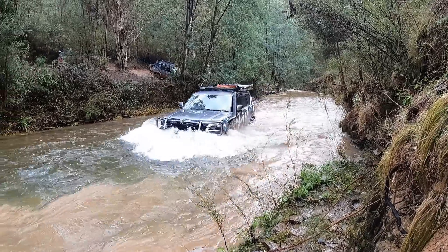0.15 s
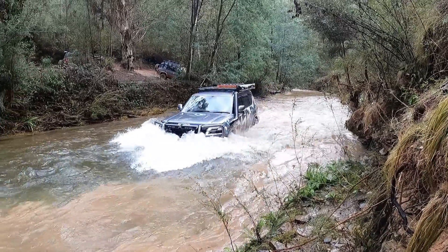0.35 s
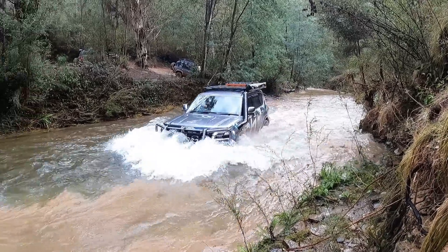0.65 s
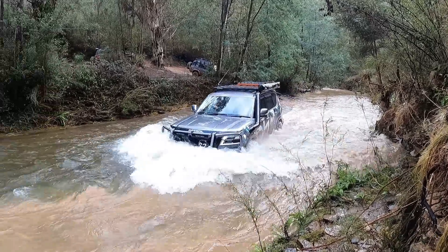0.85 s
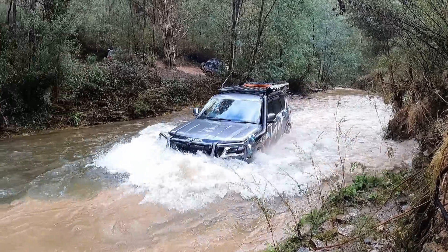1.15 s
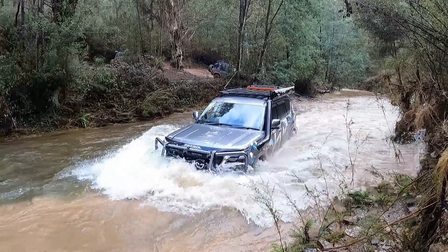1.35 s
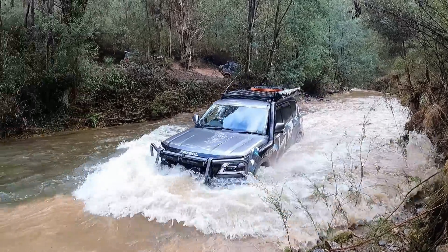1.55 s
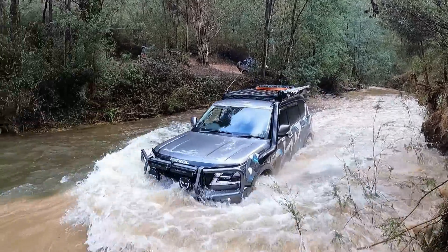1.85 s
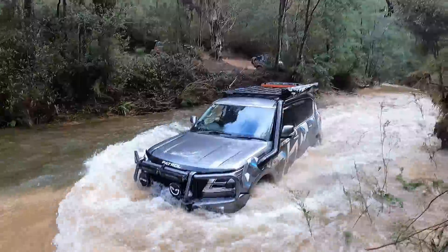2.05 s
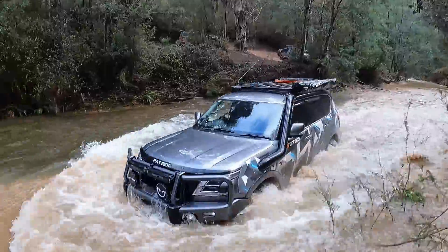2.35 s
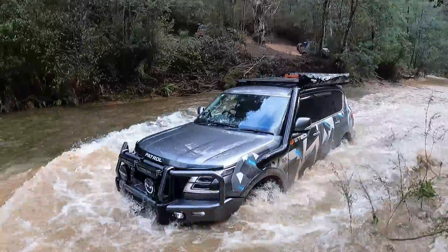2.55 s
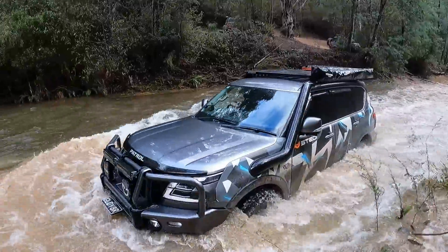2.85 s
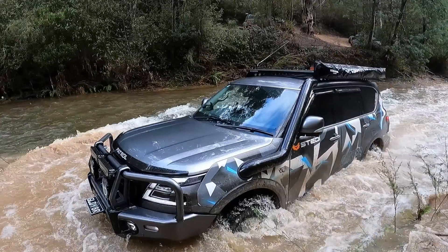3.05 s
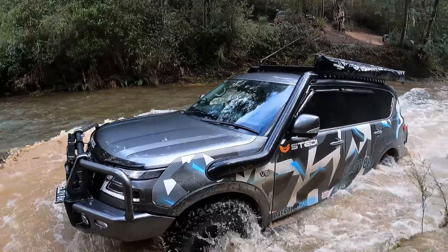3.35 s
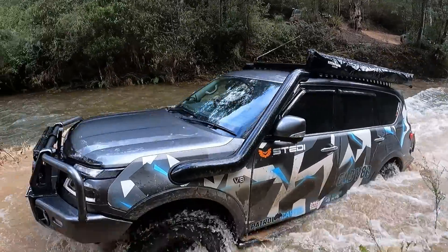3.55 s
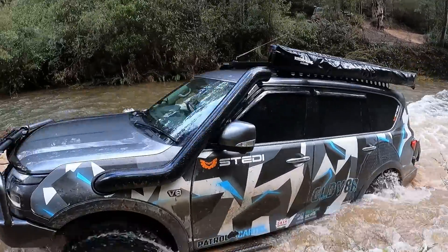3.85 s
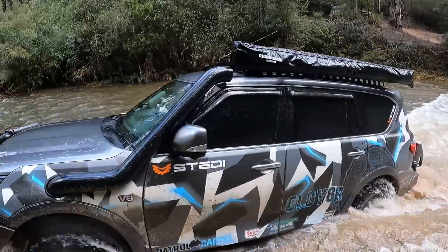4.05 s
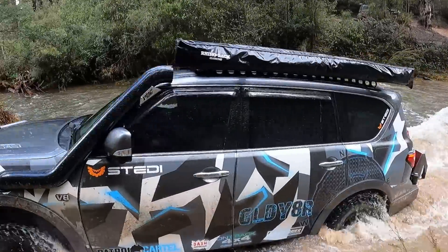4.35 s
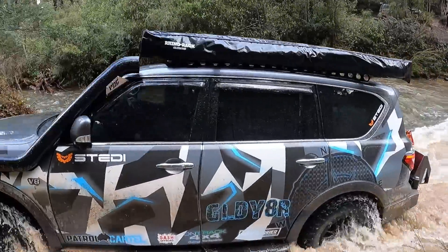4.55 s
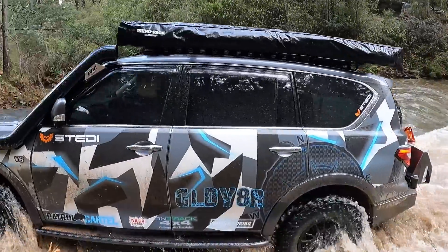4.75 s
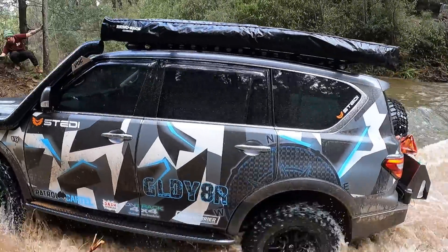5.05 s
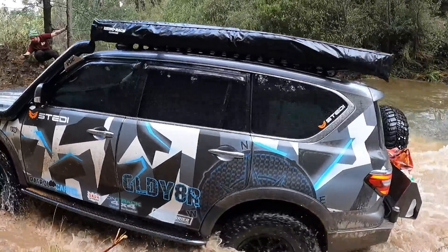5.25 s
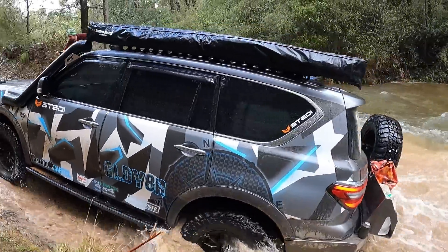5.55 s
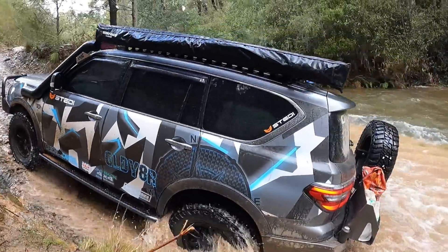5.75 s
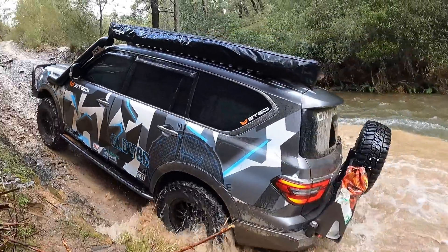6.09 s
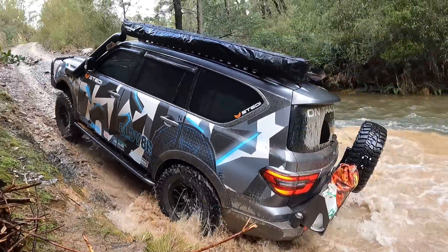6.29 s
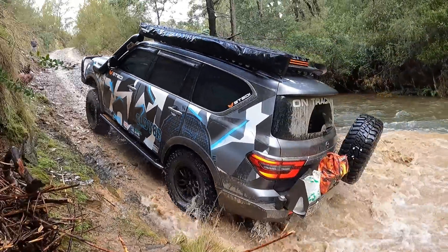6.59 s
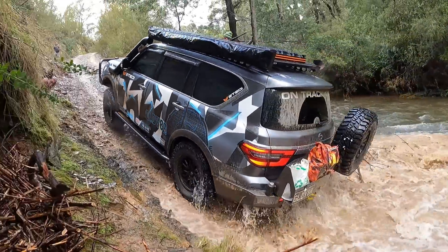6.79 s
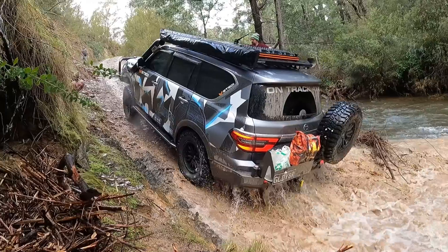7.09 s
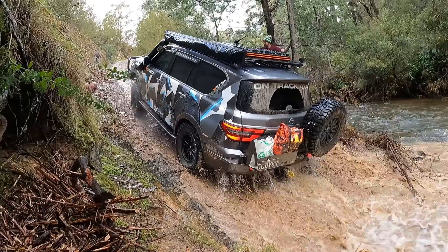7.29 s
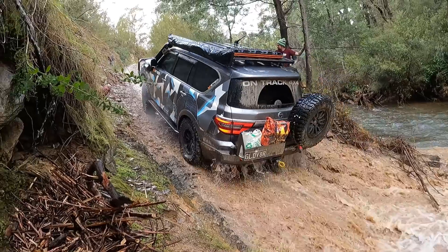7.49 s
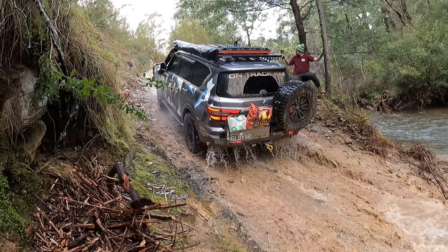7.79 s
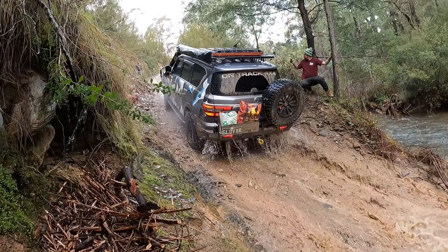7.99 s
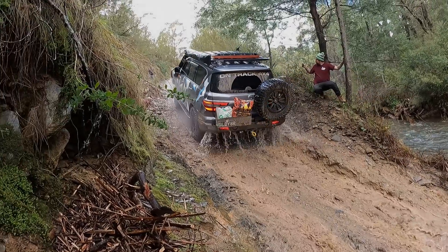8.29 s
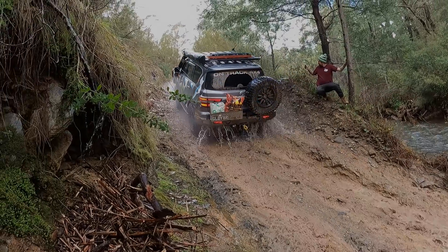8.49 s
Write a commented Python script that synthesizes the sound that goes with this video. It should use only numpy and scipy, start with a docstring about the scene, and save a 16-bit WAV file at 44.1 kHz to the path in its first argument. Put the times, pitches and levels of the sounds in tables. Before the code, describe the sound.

Outdoors at a creek, close stereo microphone on the bank. A V8 four-wheel-drive wades nearer, exhaust burbling unevenly under water amid steady foamy churning and spray. Around three seconds the exhaust is drowned and water dominates; deep glugs follow, the pipe clears with a loping rasp, the splashing thins to run-off, and the engine revs up the muddy bank.

```python
"""A creek with a muddy bank: an eight-cylinder four-wheel-drive wades through and revs its way out.
Firing harmonics, shaped by pipe and water, burble under the surface, are drowned for about a second,
then sound freely with a loping beat; modulated noise and overtones add a rasp under throttle.
Coloured noise and swarms of ringing bubbles make the churning water, foam, spray and run-off."""
import sys
import numpy as np
from scipy import signal
from scipy.fft import rfft, irfft, next_fast_len
from scipy.io import wavfile
from scipy.ndimage import uniform_filter1d, map_coordinates

SR = 44100
rng = np.random.default_rng(int(sys.argv[2]) if len(sys.argv) > 2 else 0)


def log_audio(samples):
    """Write samples as a 16-bit WAV file to the path given in sys.argv[1]."""
    # one column per channel
    frames = np.atleast_2d(samples).T
    # limit to full scale, then quantise
    limited = np.clip(frames, -1, 1)
    pcm = np.round(limited * 32767).astype(np.int16)
    wavfile.write(sys.argv[1], SR, pcm)


N = 380583  # length in samples

# Engine speed. Each row: time in seconds, crankshaft speed in rpm.
ENGINE_SPEED = [(0.0, 2560.0), (0.3, 2565.0), (0.69, 2380.0), (1.1, 2495.0), (1.72, 2470.0), (2.15, 2230.0),
                (2.5, 2445.0), (3.14, 2600.0), (4.58, 2369.0), (4.92, 2135.0), (5.5, 2280.0), (6.2, 2168.0),
                (6.5, 2315.0), (6.9, 3043.0), (7.25, 3165.0), (7.42, 2990.0), (7.9, 2740.0), (8.35, 3060.0),
                (8.63, 3950.0)]
# The eight firings in turn, one cylinder weak. Each row: bank as +1 or -1, relative strength.
FIRINGS = [(1, .7), (-1, 1), (1, 1), (1, 1), (-1, 1), (1, 1), (-1, 1), (-1, 1)]
# Pushes on the throttle. Each row: on in seconds, off in seconds, opening time in seconds,
# lift of the firing note in dB, lift of the lope in dB, lift of the rasp in dB.
THROTTLE_PUSHES = [(0.645, 1.198, .16, 11, -1, 6), (1.75, 3.18, 0.48, 12, 1, 5),
                   (2.425, 3.128, 0.31, 4.5, -6, 1.5), (4.1, 4.4, .15, 8, -7, 0),
                   (4.55, 4.85, 0.036, 8, 4.5, 5.5), (4.85, 5.667, 0.089, 1, 0.5, 8.5),
                   (6.14, 7.192, 0.51, 6, -0.5, 3), (7.8, 8.7, 0.36, 2, 1.5, 10.5)]
# The firing note. Each row: multiple of the four-stroke cycle rate, relative level in dB.
NOTE_ORDERS = [(8, -15.5), (16, -42)]
# The beat of unequal cylinders and banks. Each row: multiple of the cycle rate, relative level in dB.
LOPE_ORDERS = [(3, -22), (4, -35), (5, -18), (6, -18.5), (7, -32.5), (9, -23.5), (10, -42.5), (11, -21),
               (12, -34), (13, -26), (14, -33)]
# Overtones of a wide throttle. Each row: multiple of the cycle rate, relative level in dB.
GROWL_ORDERS = [(15, -4), (17, -5.5), (18, 0), (19, 2), (20, 0), (21, -1), (22, 2.5), (23, -8.5),
                (25, -1.5), (26, 0), (29, -13.5), (30, -11), (31, -22), (33, -7), (35, -12), (38, -7),
                (41, 1.5)]
# Response of pipe and silencer. Each row: frequency in Hz, gain in dB.
PIPE_RESPONSE = [(56, -6), (68, -9.5), (78, -20), (92, -14.5), (110, -11.5), (130, 0), (150, 0),
                 (185, -2.5), (210, -2), (255, -1), (272, -7), (292, -21.5), (335, -9.5), (400, -8.5),
                 (460, -20)]
# Effect of water over the tailpipe on its tones. Each row: frequency in Hz, gain in dB.
WATER_MUFFLE = [(60, -5), (100, -3), (122, 0.5), (165, -5), (225, -16)]
# Colour of the exhaust rasp. Each row: frequency in Hz, relative level in dB per Hz.
RASP_COLOUR = [(150, -29), (280, 10), (400, -1.5), (480, -2), (560, -0.5), (680, -14.5), (950, -7),
               (1200, -14.5), (1550, -21), (2000, -25), (5000, -46), (12000, -75)]
# Level of the heavy water. Each row: time in seconds, rumble level in dB.
RUMBLE_LEVEL = [(0, -30), (1.7, -31), (2.6, -35), (3.1, -29.5), (4.5, -25.5), (5.1, -45), (6.5, -32),
                (7.4, -42), (8.63, -37)]
# Colour of the heavy rumble. Each row: frequency in Hz, relative level in dB per Hz.
RUMBLE_COLOUR = [(12, -29), (24, -6), (34, 6.5), (62, 4), (95, 5), (130, -7), (250, -53)]
# Colour of the slosh and of the low exhaust roar. Each row: frequency in Hz, relative level in dB per Hz.
SLOSH_COLOUR = [(70, -23), (110, -1.5), (170, -2), (250, -5.5), (310, -8), (370, -9.5), (460, -36),
                (900, -61)]
# White water. Each row: time in seconds, relative foam level in dB, relative spray level in dB.
WHITE_WATER_LEVELS = [(0.04, -29.5, -35.5), (0.11, -32.5, -39.5), (0.2, -30, -35.5), (0.99, -28.5, -34),
                      (1.21, -29, -35), (2.21, -26.5, -32), (2.93, -30.5, -36.5), (3.0, -27.5, -32.5),
                      (3.24, -28.5, -34.5), (3.7, -25.5, -29.5), (4.56, -25.5, -31), (5.46, -36, -40.5),
                      (6.4, -34.5, -39.5), (6.87, -39.5, -45.5), (8.26, -36.5, -40), (8.62, -37.5, -51)]
# Breaking crests of the bow wave. Each row: time of the peak in seconds, lift in dB.
CRESTS = [(0.36, 1), (0.87, 2.5), (1.88, 1.5), (2.13, 3), (2.33, 1.5), (2.66, 1.5), (4.86, 0.5),
          (5.05, 0.5)]
# Colour of the foam. Each row: frequency in Hz, relative level in dB per Hz.
FOAM_COLOUR = [(150, -7), (300, 3), (420, 0.5), (600, 2), (770, 0), (930, 0), (1300, -0.5), (1800, -3),
               (2600, -7.5), (4000, -13.5), (9000, -60)]
# Colour of water streaming off the body onto mud. Each row: frequency in Hz, relative level in dB per Hz.
RUNOFF_COLOUR = [(250, -8.5), (450, 2), (620, -1), (760, -2.5), (950, 0), (1200, -3), (1900, -6),
                 (2600, -9), (4000, -17.5), (9000, -48)]
# Colour of the spray. Each row: frequency in Hz, relative level in dB per Hz.
SPRAY_COLOUR = [(800, -23), (1800, 0.5), (2800, -5), (3800, -2), (4900, -1), (5600, -4.5), (7500, -5.5),
                (8100, -10.5), (10800, -16.5), (12200, -17), (13300, -25), (15500, -64)]
# Single sharp splashes. Each row: start in seconds, initial level in dB, centre frequency in Hz.
SPLATS = [(2.654, -31, 5500), (2.664, -41, 11000), (3.785, -26.5, 5300), (8.526, -29, 2500)]
# Water tumbling in the wheel arches as they pass. Each row: time in seconds, level in dB.
ARCH_LEVEL = [(3.1, -61), (3.55, -28), (3.9, -29), (4.6, -28), (5.2, -35), (5.6, -67)]
# Colour of the wheel-arch water. Each row: frequency in Hz, relative level in dB per Hz.
ARCH_COLOUR = [(120, -23), (210, 6), (280, 4.5), (350, 0), (440, -23), (800, -47.5)]
# Big bubbles blown as the tailpipe nears the surface. Each row: time in seconds, level in dB.
GLUG_LEVEL = [(3.9, -66), (4.2, -22.5), (4.5, -26.5), (4.8, -19.5), (4.95, -33), (5.15, -57)]
# Colour of the big bubbles. Each row: frequency in Hz, relative level in dB per Hz.
GLUG_COLOUR = [(20, -14), (36, -7), (58, 4.5), (75, 9), (110, -23), (220, -59)]
# Stereo likeness. Each row: frequency in Hz, left-right correlation.
LIKENESS = [(40, .997), (150, .997), (300, .97), (700, .9), (1400, .89), (2800, .74), (5600, .87),
            (9500, .93), (13000, .6)]
# Unequal colour of the two microphone ports. Each row: frequency in Hz, left minus right in dB.
PORT_DIFFERENCE = [(300, 0), (700, -.7), (2500, -.5), (5500, .4), (9000, 1.3), (13000, -.2)]

BANK_LAG = .05  # one bank's gas arrives this late, the other's this early, in firing intervals
PUSH_FALL_S = 0.12  # release of every throttle push
# the tailpipe is plunged deep, then works its way up
DROWN_S, RISE_S, DROWN_TAKES_S, RISE_TAKES_S, DROWN_DB = 3.16, 4.04, .26, 0.57, -15.5
PIPE_CLEARS_FROM_S, PIPE_CLEARS_TO_S = 4.76, 4.9  # the tailpipe clears the surface
WHEELS_CLEAR_FROM_S, WHEELS_CLEAR_TO_S = 3.3, 6.5  # the wheels leave the creek
NOTE_WET_DB = -9  # further loss of the firing note under water
FLUTTER_WET, FLUTTER_DRY = .16, .045  # random swing of the tones: radians of phase, fraction of level
# rasp at the reference cycle rate, its change under water, its growth with speed
RASP_DB, RASP_WET_DB, RASP_DB_PER_OCTAVE = -43.5, -1, 13.5
FULL_REV_HZ = 33  # reference rate: four-stroke cycles per second at full revs
GROWL_DB, ROAR_DB = -2.5, 6.5  # overtones and low turbulence, relative to the rasp
SLOSH_DB, SLOSH_ASHORE_DB = -29, -30  # while wading, and on the bank
CREST_RISE_S, CREST_FALL_S = 0.076, 0.092
TOP_HZ = 15700  # upper band limit


def amp(db):
    """Level in decibels determines amplitude gain by a power of ten."""
    return 10 ** (np.asarray(db) / 20)


def unit(x):
    """Division by the root mean square normalises a signal's power to one."""
    return x / np.sqrt(np.mean(x ** 2) + 1e-20)


def along(points, hz):
    """Interpolation is linear along a logarithmic frequency axis."""
    point_hz, value = np.transpose(points)
    return np.interp(np.log(hz + 1), np.log(point_hz + 1), value)


def curves(rows):
    """Linear interpolation in time turns each column after the first into a continuous control."""
    s, *columns = np.transpose(rows)
    return [np.interp(np.arange(N) / SR, s, column) for column in columns]


def ramp(start, end):
    """Linear transition: 0 before start, 1 after end."""
    return np.clip((np.arange(N) / SR - start) / max(end - start, 1e-3), 0, 1)


def held(on, off, rise, fall):
    """Trapezoidal envelope: attack from on, hold at 1, release from off."""
    return ramp(on, on + rise) - ramp(off, off + fall)


def wobble(rate):
    """Smooth random modulation: a spline through independent random knots, rate of them a second."""
    knots = rng.standard_normal(int(N * rate / SR) + 4)
    coarse = np.arange(0, N, 32)
    smooth = map_coordinates(knots, [coarse * rate / SR])
    return np.interp(np.arange(N), coarse, smooth)


def filtered(x, response):
    """Linear filtering: the spectrum is multiplied by a gain that depends on frequency."""
    size = next_fast_len(N + SR // 4)
    spectrum = rfft(x, size) * response(np.fft.rfftfreq(size, 1 / SR))
    return irfft(spectrum, size)[..., :N]


def patchy(depth_db):
    """Intermittent turbulence: two noises share random patches of strength in time and frequency."""
    z = signal.stft(rng.standard_normal((2, N)), nperseg=512)[2]
    field = uniform_filter1d(rng.standard_normal(z.shape[1:]), size=7, axis=0)
    field = uniform_filter1d(field, size=9, axis=1)
    noise = signal.istft(z * amp(depth_db * unit(field)), nperseg=512)[1]
    return unit(noise[:, :N])


def placed(pair, colour):
    """Interchannel correlation: two signals are coloured and mixed to stereo, bass most alike, rms 1."""
    def mid_side_gain(hz):
        angle = np.arccos(np.clip(along(LIKENESS, hz), -1, 1)) / 2
        return amp(along(colour, hz)) * np.array([np.cos(angle), np.sin(angle)])

    mid, side = filtered(pair, mid_side_gain)
    return unit(np.array([mid + side, mid - side]))


def bubbles(count, low_hz, high_hz, cycles, scatter_db, rise, size):
    """Bubble resonance: each bubble rings as a damped sine of rising pitch; gives mid and side."""
    when, pitch, chance, place = rng.random((count, 4)).T[:, :, None]
    bubble_hz = low_hz * (high_hz / low_hz) ** pitch
    age = bubble_hz * np.arange(size) / SR / cycles  # in decay times
    strength = amp(-scatter_db * np.log(np.maximum(chance, .004)))
    ring = strength * np.exp(-age) * np.sin(2 * np.pi * cycles * age * (1 + rise * age))
    at = ((when * N).astype(int) + np.arange(size)).ravel()
    mid_side_weights = (1, 2 * place - 1)
    return np.array([unit(np.bincount(at, (ring * w).ravel(), N)[:N]) for w in mid_side_weights])


def timing(order):
    """Fourier phase, in radians, of an exhaust order produced by the uneven firings."""
    bank, strength = np.transpose(FIRINGS)
    arrival = (np.arange(len(bank)) + BANK_LAG * bank) / len(bank)
    return np.angle(np.sum(strength * np.exp(-2j * np.pi * order * arrival)))


def tones(orders, shade_db, angle, cycle_hz, flutter, spread=0):
    """Harmonic synthesis: each order is shaded by its frequency; spread scatters the phases."""
    wave = 0
    for order, db in orders:
        k = round(order)
        phase = k * angle + timing(k) + spread * rng.standard_normal() + flutter * wobble(22)
        level = amp(db + shade_db(k * cycle_hz)) * (1 + flutter * wobble(22))
        wave = wave + level * np.cos(phase)
    return np.sqrt(2) * wave


def exhaust_rasp(angle, cycle_hz):
    """Flow noise: turbulent gas puffs with the firing cycle, among overtones and a low roar."""
    growl = tones(GROWL_ORDERS, lambda hz: along(RASP_COLOUR, hz), angle, cycle_hz, flutter=.1, spread=2)
    # one strong swell a cycle, with a smaller pulse at each of eight firings
    puffs = amp(8.5 * np.cos(angle + 2) + 5 * np.cos(8 * angle))
    gas = placed(puffs * patchy(depth_db=-2.7), RASP_COLOUR)
    # turbulence takes over from the overtones in the treble
    gas = filtered(gas, lambda hz: amp(along([(500, -10), (1100, 2)], hz)))
    roar = placed(rng.standard_normal((2, N)), SLOSH_COLOUR)
    return gas + amp(GROWL_DB) * growl + amp(ROAR_DB) * roar


def exhaust():
    """Source and filter: uneven firing orders slide through pipe resonances, muffled by the water."""
    cycle_hz = curves(ENGINE_SPEED)[0] / 120  # two turns a cycle, sixty seconds a minute
    angle = 2 * np.pi * np.cumsum(cycle_hz) / SR
    wet = 1 - ramp(PIPE_CLEARS_FROM_S, PIPE_CLEARS_TO_S)
    note_lift_db, lope_lift_db, rasp_lift_db = sum(
        np.outer(lifts, held(on, off, rise, PUSH_FALL_S)) for on, off, rise, *lifts in THROTTLE_PUSHES)

    # gas bubbling out under water flutters; the tones steady as the pipe lifts clear
    flutter = FLUTTER_DRY + wet * (FLUTTER_WET - FLUTTER_DRY)
    pipe_db = lambda hz: along(PIPE_RESPONSE, hz) + wet * along(WATER_MUFFLE, hz)
    note = tones(NOTE_ORDERS, pipe_db, angle, cycle_hz, flutter)
    note = amp(note_lift_db + wet * NOTE_WET_DB) * note
    lope = amp(lope_lift_db) * tones(LOPE_ORDERS, pipe_db, angle, cycle_hz, flutter)

    speed_db = RASP_DB_PER_OCTAVE * np.log2(cycle_hz / FULL_REV_HZ)
    rasp_db = RASP_DB + rasp_lift_db + wet * RASP_WET_DB + speed_db
    rasp = amp(rasp_db) * exhaust_rasp(angle, cycle_hz)
    drowned = held(DROWN_S, RISE_S, DROWN_TAKES_S, RISE_TAKES_S)
    return amp(DROWN_DB * drowned) * (note + lope + rasp)


def rumble():
    """Bulk displacement: water shoved by wheels and body gives low-frequency noise."""
    return amp(curves(RUMBLE_LEVEL)[0]) * placed(rng.standard_normal((2, N)), RUMBLE_COLOUR)


def slosh():
    """Entrained air: large trapped pockets ring low amid the noise, easing slightly towards the bank."""
    level_db = SLOSH_DB + ramp(WHEELS_CLEAR_FROM_S, WHEELS_CLEAR_TO_S) * (SLOSH_ASHORE_DB - SLOSH_DB)
    gulps = bubbles(count=2400, low_hz=120, high_hz=450, cycles=3, scatter_db=1, rise=.03, size=1900)
    return amp(level_db) * placed(rng.standard_normal((2, N)) + .5 * gulps, SLOSH_COLOUR)


def white_water():
    """Bubble size sets pitch: foam rings below fine spray, and foam gives way to run-off ashore."""
    foam_db, spray_db = curves(WHITE_WATER_LEVELS)
    surge = wobble(14)
    crest_db = sum(db * held(s - CREST_RISE_S, s, CREST_RISE_S, CREST_FALL_S) for s, db in CRESTS)
    fizz = bubbles(count=8000, low_hz=800, high_hz=3500, cycles=7, scatter_db=2.2, rise=.02, size=500)
    drops = bubbles(count=38000, low_hz=2400, high_hz=11000, cycles=3.5, scatter_db=2.4, rise=.02, size=130)
    froth = patchy(depth_db=.8) + 0.18 * fizz
    ashore = ramp(WHEELS_CLEAR_FROM_S, WHEELS_CLEAR_TO_S)
    foam = (1 - ashore) * placed(froth, FOAM_COLOUR) + ashore * placed(froth, RUNOFF_COLOUR)
    foam = amp(foam_db + 1.0 + 0.67 * surge) * foam
    spray = placed(patchy(depth_db=0.75) + .5 * drops, SPRAY_COLOUR)
    spray = amp(spray_db + 0.85 + .5 * surge) * spray
    return amp(crest_db) * (foam + spray)


def splats():
    """Impact noise: flung water and mud land in resonant bursts that start at once and die fast."""
    out, t = np.zeros(N), np.arange(N) / SR
    for s, db, centre_hz in SPLATS:
        resonance = lambda hz: 1 / (1 + ((hz - centre_hz) / (0.13 * centre_hz)) ** 2)
        burst = unit(filtered(rng.standard_normal(N), resonance))
        decay = amp(db - 60 * np.abs(t - s) / 0.05)  # 60 dB in 0.05 s
        out += burst * (t >= s) * decay
    return out


def wheel_arches():
    """Band-limited turbulence: water tumbles in the wheel arches as they pass."""
    return amp(curves(ARCH_LEVEL)[0]) * placed(rng.standard_normal((2, N)), ARCH_COLOUR)


def glugs():
    """Large bubbles sound low: a band of deep noise swells as the tailpipe nears the surface."""
    return amp(curves(GLUG_LEVEL)[0]) * placed(rng.standard_normal((2, N)), GLUG_COLOUR)


def scene():
    """Superposition: the pressures of the vehicle and the water around it add."""
    return exhaust() + rumble() + slosh() + white_water() + splats() + wheel_arches() + glugs()


def record(dry):
    """Interaural-style cues: the ports differ in colour and the left lags slightly, below a band limit."""
    lag_samples = .55
    half = np.array([[.5], [-.5]])  # each port takes half the difference, left first

    def ports(hz):
        delay = np.exp(-2j * np.pi * hz * half * lag_samples / SR)
        return amp(half * along(PORT_DIFFERENCE, hz)) * delay * (hz < TOP_HZ)

    soft_ends = signal.windows.tukey(N, .0007)
    return filtered(dry * soft_ends, ports)


dry = scene()
out = record(dry)
log_audio(out)
```